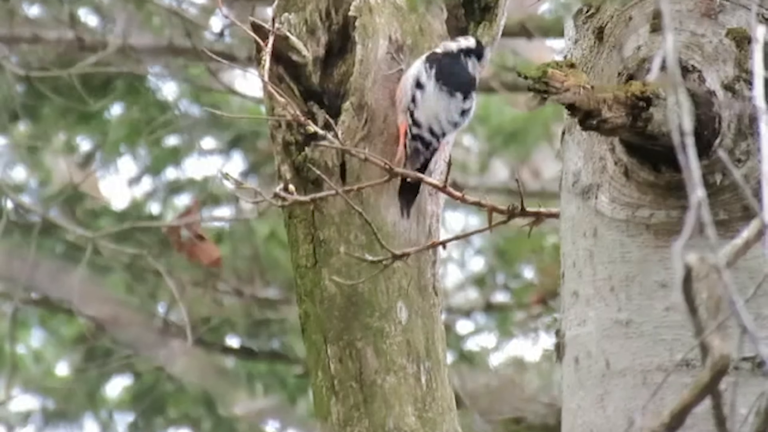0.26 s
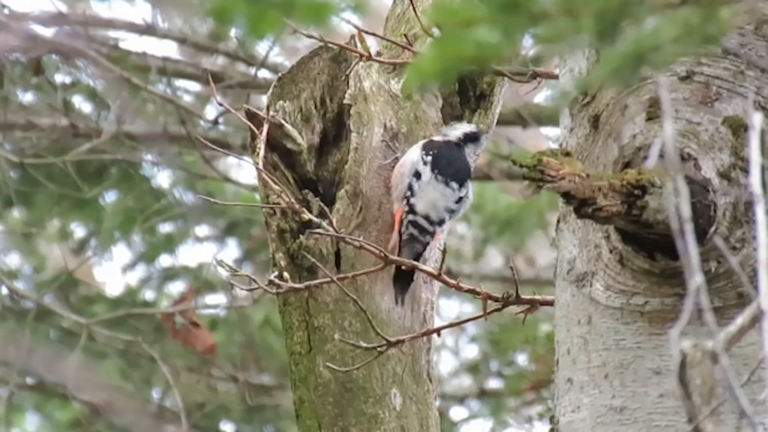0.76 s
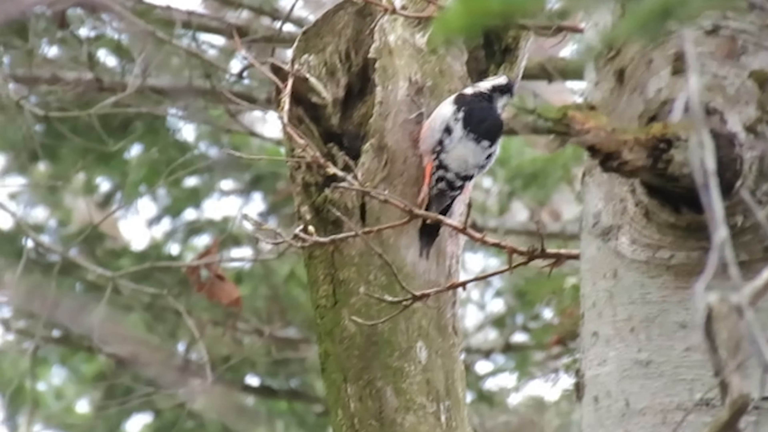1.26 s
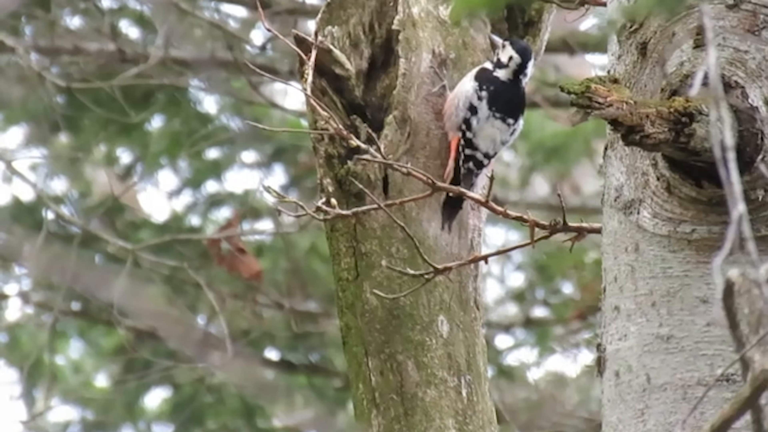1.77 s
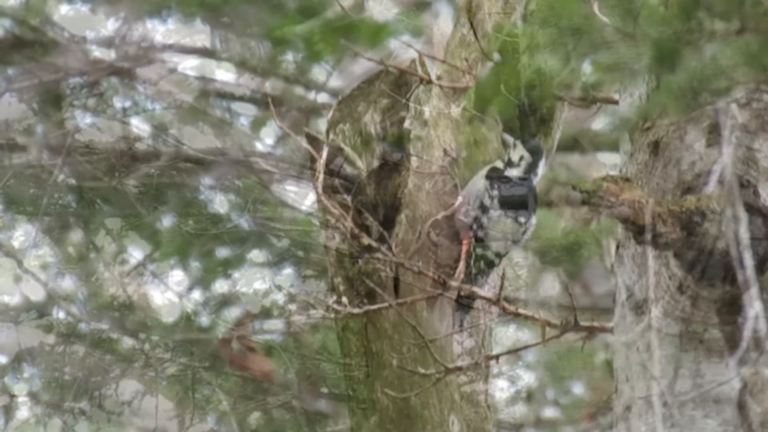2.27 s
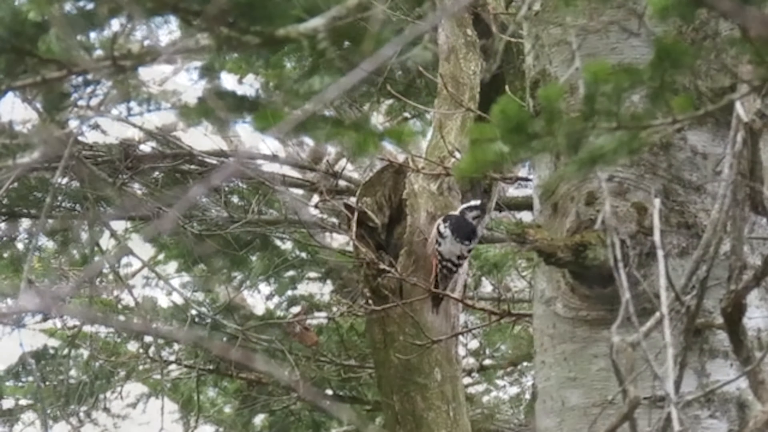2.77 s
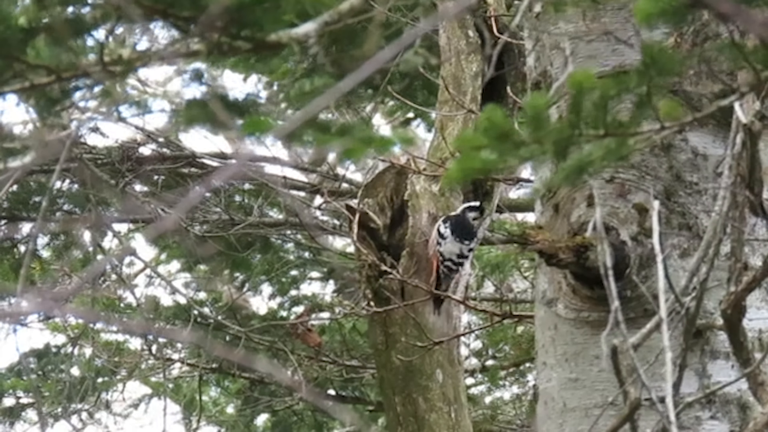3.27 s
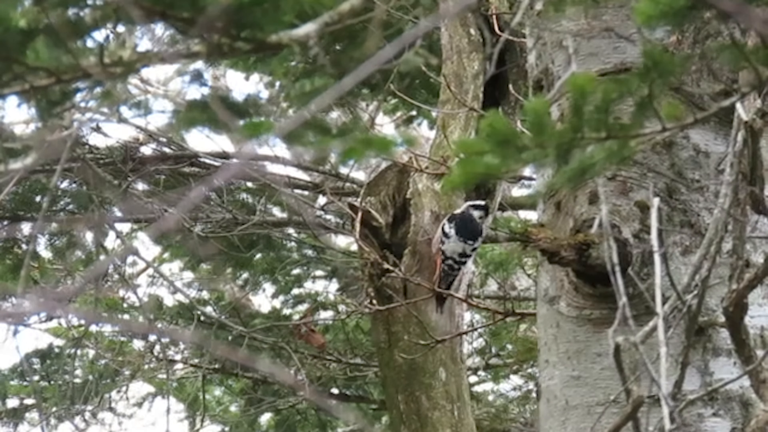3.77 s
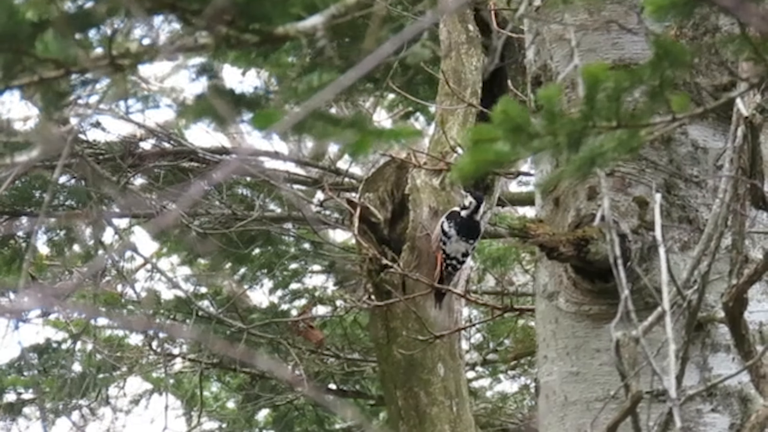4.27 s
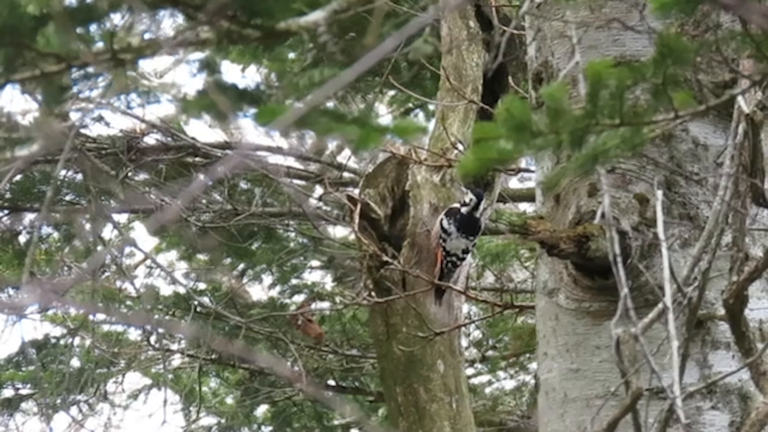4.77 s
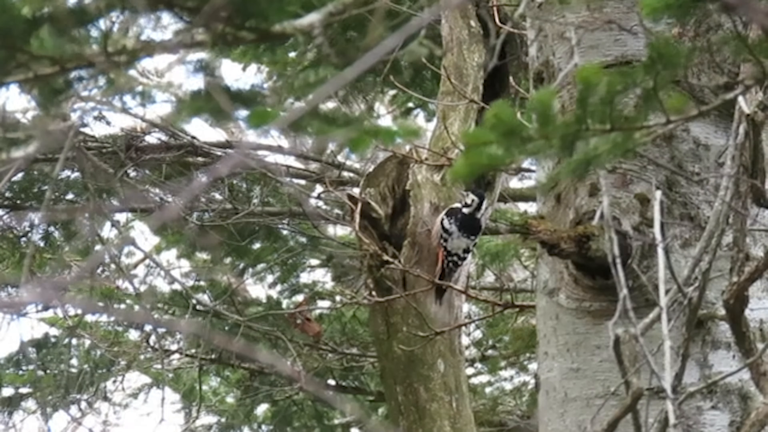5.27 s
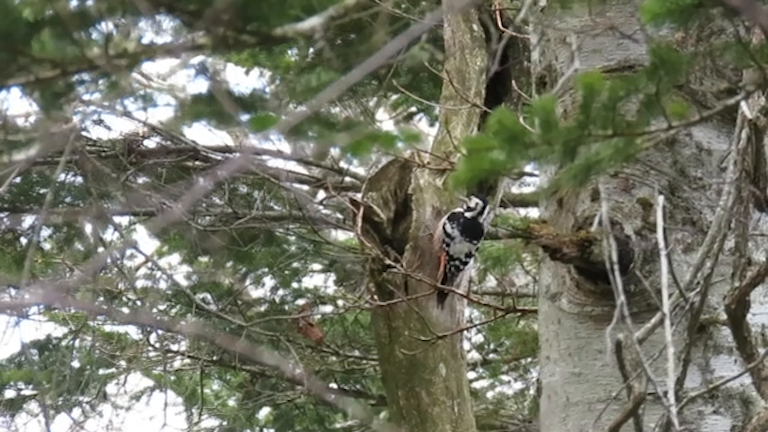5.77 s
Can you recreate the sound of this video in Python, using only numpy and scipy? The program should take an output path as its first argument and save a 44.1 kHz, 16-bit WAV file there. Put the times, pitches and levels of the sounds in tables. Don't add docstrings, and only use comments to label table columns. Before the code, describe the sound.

Fast resonant woodpecker drumming in echoing woods, slowing never but quickening and fading, repeated once, followed by faint crow caws and low wind thumps.

```python
import sys
import numpy as np
from scipy import signal
from scipy.fft import rfft, irfft
from scipy.io import wavfile

SR = 44100
rng = np.random.default_rng(int(sys.argv[2]) if len(sys.argv) > 2 else 0)


def store_pcm(level_fs):
    pcm = np.round(np.clip(level_fs, -1, 1) * 32767).astype(np.int16)
    wavfile.write(sys.argv[1], SR, np.atleast_2d(pcm).T)


def attenuation_scalar(level_db):
    decades = np.asarray(level_db, float) / 20
    return 10 ** decades


N = 265967
RUN_IN = SR // 5

# time [s], peak level [dB].
SCENE_CHANGES = [
    (2.59, -62),
    (2.69, -39),
    (.003, -40),
]


def rms_one(x):
    return x / np.sqrt(np.mean(x ** 2) + 1e-20)


def at_hz(points, hz):
    point_hz, value = np.transpose(points)
    return np.interp(np.log(hz), np.log(point_hz), value)


def drift(rate_hz):
    r = np.exp(-80 * np.pi * rate_hz / SR)
    slow = signal.lfilter([1], [1, -2 * r, r * r], rng.standard_normal(N // 40 + 2002))[2000:]
    return np.interp(np.arange(N) / 40, np.arange(len(slow)), rms_one(slow))


def ring(clicks, hz, t60_s):
    r, w = attenuation_scalar(-60 / (t60_s * SR)), 2 * np.pi * hz / SR
    return signal.lfilter([0, np.sin(w)], [1, -2 * r * np.cos(w), r * r], clicks + 1e-18)


def coloured(noise, spectrum):
    hz = np.fft.rfftfreq(noise.shape[-1], 1 / SR) + 1
    return irfft(rfft(noise) * attenuation_scalar(at_hz(spectrum, hz)), noise.shape[-1])


def band_pass(x, order, low_hz, high_hz):
    return signal.sosfilt(signal.butter(order, [low_hz, high_hz], "band", fs=SR, output="sos"), x)


def low_pass(x, order, hz):
    return signal.sosfilt(signal.butter(order, hz, fs=SR, output="sos"), x)


def delayed(x, s):
    lag = round(s * SR)
    return np.concatenate([np.zeros(lag), x[:-lag]])


def dulled(x, hz):
    r = np.exp(-2 * np.pi * hz / SR)
    return signal.lfilter([1 - r], [1, -r], x)


def stereo(mid, side):
    return np.array([mid + side, mid - side])


def patchy(air, patchy_db):
    edges_hz = [30, 300, 700, 1500, 3000, 6000, 12000]
    out = air * attenuation_scalar(0.39 * drift(3.5))
    for low, high in zip(edges_hz, edges_hz[1:]):
        out = out + band_pass(air, 1, low, high) * (attenuation_scalar(patchy_db * drift(9.0)) - 1)
    return out


def hush(patchy_db):
    # frequency [Hz], density [dB per Hz].
    hush_spectrum = [(20, -13), (50, 4), (125, -7), (250, 1), (630, -2), (1000, -1.5), (1600, -9.5),
                     (2500, -15.5), (4000, -24), (6300, -28.5), (10000, -36), (12500, -38), (14500, -53)]
    # frequency [Hz], side against mid [dB].
    hush_side = [(30, -1), (60, -17.5), (140, 3), (490, 1), (1130, -5.5), (2600, -1.5), (5000, 1),
                 (12000, 1)]
    # time [s], pitch [Hz], level [dB].
    drone_track = [
        (2.45, 60.9, -83),
        (2.7, 78.64, -52),
        (3.1, 83.5, -54),
        (3.5, 97, -55.5),
        (4.0, 98.5, -54.5),
        (4.3, 89.4, -70),
    ]
    t = np.arange(N) / SR
    join_s = SCENE_CHANGES[1][0]
    level_db = np.where(t < join_s, -50 - 0.5 * t, -50.5 - 0.2 * (t - join_s))
    mid, side = rng.standard_normal((2, N))
    air = coloured(np.array([mid, coloured(side, hush_side)]), hush_spectrum)
    air = low_pass(air, 6, 13300)
    air = patchy(air / np.std(air[0]), patchy_db) * attenuation_scalar(level_db)
    track_s, track_hz, track_db = np.transpose(drone_track)
    drone_hz = np.interp(t, track_s, track_hz) * (1 + .07 * drift(10.0))
    drone_db = np.interp(t, track_s, track_db) - 2 + 4 * drift(7.0)
    drone = attenuation_scalar(drone_db) * np.sin(2 * np.pi * np.cumsum(drone_hz) / SR)
    drone = drone * (t > track_s[0]) * (t < track_s[-1])
    return stereo(air[0] + drone, air[1])


def scene_change_clicks():
    out = np.zeros(N)
    for s, db in SCENE_CHANGES:
        out[max(round(s * SR), 1)] = attenuation_scalar(db)
    return out


def wind():
    # peak time [s], peak level [dB].
    gusts = [(4.46, -40.5), (4.68, -46.5), (4.86, -44.5), (5.09, -51), (5.2, -38), (5.289, -32),
             (5.43, -43), (5.5, -38), (5.65, -34.5), (5.76, -37.5), (5.89, -43), (6.0, -40.5)]
    # time [s], mid peak [dB], side peak [dB], width [cycles].
    eddies = [(4.402, -31.5, -34, 0.86), (4.449, -27, -28, 1), (4.468, -26, -21, 0.62),
              (4.52, -20.5, -17.5, 0.26), (4.653, -38, -37, 1), (4.752, -32.5, -35, 1.1),
              (4.835, -37, -27, 0.45), (4.865, -49, -33, 0.34), (4.92, -39, -34, 0.51),
              (5.064, -37, -34, 0.52), (5.176, -33, -29, 0.7), (5.239, -38, -24, 0.74),
              (5.273, -24.5, -15, 0.69), (5.299, -30, -11, 0.93), (5.497, -24.5, -7.5, 0.42),
              (5.522, -32, -21, .36), (5.614, -33, -24, 0.85), (5.648, -16.5, -9.5, 0.3),
              (5.665, -33, -19, 0.4), (5.738, -21, -13.5, 0.22), (5.949, -22, -25, 0.14)]
    rise_db_per_s, fall_db_per_s, gust_side_db = 128, 187, -1
    low_hz, high_hz, side_lift = 43, 139, 1.27
    t = np.arange(N) / SR
    slopes_db = [db - np.maximum(rise_db_per_s * (s - t), fall_db_per_s * (t - s)) for s, db in gusts]
    gust = attenuation_scalar(np.max(slopes_db, axis=0) + 3 * drift(25.0))
    mid = gust * rms_one(band_pass(rng.standard_normal(N), 2, low_hz, high_hz))
    side = rms_one(band_pass(rng.standard_normal(N), 2, low_hz * side_lift, high_hz * side_lift))
    side = gust * side * attenuation_scalar(gust_side_db)
    span = np.arange(-SR // 20, SR // 20)
    for s, mid_db, side_db, cycles in eddies:
        phase = rng.uniform(-0.52, 0.7)
        i = round(s * SR) + span
        side_turns = span / SR * (118 + 1.5 * (side_db + 30))
        mid_turns = side_turns / side_lift
        mid[i] += attenuation_scalar(mid_db) * np.exp(-(mid_turns / cycles) ** 2) * np.cos(2 * np.pi * mid_turns + phase)
        side_swell = attenuation_scalar(side_db) * np.exp(-(side_turns / cycles) ** 2)
        side[i] += side_swell * np.sin(2 * np.pi * side_turns + phase)
    return stereo(mid, side)


def hoarse_calls():
    # start [s], length [s], resonance [Hz], width [Hz], level
    # [dB].
    hoarse = [(-.06, .33, 4700, 200, -67), (.22, .45, 3800, 1400, -65), (3.7, .17, 52, 12, -55),
              (3.2, .85, 260, 40, -63), (4.4, .27, 2700, 1500, -65), (-.06, .31, 3900, 1300, -60),
              (2.4, .19, 3000, 1600, -59), (2.52, .07, 3700, 700, -65), (1.6, .52, 2800, 900, -61),
              (4.41, .14, 3150, 350, -67), (2.0, .04, 6200, 1500, -74), (5.55, .07, 6800, 700, -76),
              (2.5, .2, 70, 70, -57), (2.55, .04, 3850, 300, -64), (5.5, .15, 3300, 200, -74),
              (1.65, .05, 3350, 300, -67)]
    # start [s], length [s], level [dB].
    crow = [
        (4.42, .14, -59),
        (4.82, .19, -58),
        (5.27, .2, -57),
        (5.7, .2, -56),
    ]
    # resonance [Hz], width [Hz], level [dB].
    crow_bands = [(1200, 70, 4), (2240, 710, -5.5), (3300, 150, -21)]
    calls = hoarse + [(s, length_s, hz, width_hz, db + band_db)
                      for s, length_s, db in crow for hz, width_hz, band_db in crow_bands]
    out = np.zeros((2, N + RUN_IN))
    for s, length_s, hz, width_hz, db in calls:
        i, size = round(s * SR) + RUN_IN, round(length_s * SR)
        r = np.exp(-np.pi * width_hz / SR)
        poles = [1, -2 * r * np.cos(2 * np.pi * hz / SR), r * r]
        rough = signal.lfilter([1], np.convolve(poles, poles), rng.standard_normal((2, SR)))
        mid, side = rough[:, 4000:4000 + size]
        swell = signal.windows.tukey(size, .4)
        out[:, i:i + size] += attenuation_scalar(db) * rms_one(stereo(mid, .4 * side)) * swell
    return out[:, RUN_IN:]


def songbirds():
    # (time [s], pitch [Hz]).
    warble = [
        (-55, [(2.375, 2500), (2.39, 2950), (2.405, 3080), (2.42, 2650), (2.44, 2200)]),
        (-55, [(5.05, 2750), (5.065, 2300), (5.088, 3000), (5.108, 1850), (5.12, 1740), (5.155, 1740)]),
        (-58, [(5.22, 1950), (5.265, 2200), (5.28, 2900), (5.29, 3400), (5.308, 3900)]),
        (-61, [(5.372, 3500), (5.382, 2950), (5.398, 2900), (5.41, 2450), (5.425, 1600)]),
    ]
    # start [s], length [s], from [Hz], to [Hz], level [dB].
    whistles = [(1.56, .09, 2550, 2750, -71), (1.69, .06, 3270, 3220, -73), (1.765, .05, 3000, 3000, -65),
                (1.835, .04, 3000, 3050, -69), (1.875, .035, 2400, 2900, -65), (1.94, .04, 2700, 2800, -68),
                (1.985, .08, 2350, 2300, -68), (5.15, .05, 1740, 1750, -66), (2.345, .05, 2200, 2250, -66),
                (2.42, .03, 2600, 2150, -62), (2.3, .045, 2500, 2180, -58), (2.47, .045, 3000, 2850, -68),
                (2.545, .045, 2700, 2980, -67), (2.667, .021, 2560, 2150, -58),
                (2.55, .04, 6300, 5800, -73), (.64, .18, 7600, 7650, -85), (1.1, .1, 8050, 8150, -87),
                (1.2, .07, 8300, 7800, -87), (1.4, .1, 8300, 8100, -89), (1.5, .15, 8000, 8200, -89),
                (1.96, .12, 7900, 6900, -86), (2.78, .06, 7000, 6500, -83), (3.94, .08, 6500, 6350, -85),
                (3.9, .04, 7400, 7000, -87), (5.308, .06, 3880, 3950, -80), (2.41, .1, 3020, 3000, -74),
                (1.64, .1, 3300, 3150, -77), (1.8, .15, 2750, 2800, -76), (4.42, .1, 3150, 3150, -76)]
    glide_share, edge_s, echo_db, echo_t60_s = .35, .005, -3, .7
    notes = list(warble)
    for s, length_s, from_hz, to_hz, db in whistles:
        settled = (s + glide_share * length_s, .3 * from_hz + .7 * to_hz)
        notes.append((db, [(s, from_hz), settled, (s + length_s, to_hz)]))
    dry, waver = np.zeros(N), 1 + .008 * drift(60.0)
    for k, (db, turns) in enumerate(notes):
        turn_s, turn_hz = np.transpose(turns)
        i = np.arange(round(turn_s[0] * SR), round(turn_s[-1] * SR))
        hz = np.interp(i / SR, turn_s, turn_hz)
        level_db = db + 8.0
        if k < len(warble):
            level_db = level_db - 80 * (i - i[0]) / SR
            level_db = level_db - 7 * np.log2(hz / 2500)
        edges = signal.windows.tukey(len(i), 2 * edge_s * SR / len(i))
        dry[i] += attenuation_scalar(level_db) * edges * np.sin(2 * np.pi * np.cumsum(hz * waver[i]) / SR)
    dry = dry * attenuation_scalar(1.6 * drift(37.0))
    t = np.arange(SR // 2) / SR
    wash = rng.standard_normal((2, len(t))) * attenuation_scalar(-60 * t / echo_t60_s)
    wash = (wash + 0.75 * wash[::-1].mean(axis=0)) * attenuation_scalar(echo_db) / np.sqrt(2 * np.sum(wash[0] ** 2))
    cut = round(SCENE_CHANGES[0][0] * SR)
    wet = [signal.fftconvolve(part[None], wash, axes=1)[:, :len(part)] for part in (dry[:cut], dry[cut:])]
    return dry + np.concatenate(wet, axis=1)


def impulses(at, heights):
    out = np.zeros(N + RUN_IN)
    out[at] = heights
    return out


def stand_response():
    # frequency [Hz], density [dB per Hz].
    stand_spectrum = [(200, -47), (400, -13), (490, -14), (555, -5), (590, -0.5), (635, -4.5), (730, -17),
                      (950, -11.5), (1120, -4.5), (1310, -18), (2430, -27), (3050, -32), (4200, -49.5),
                      (6000, -70.5)]
    # frequency [Hz], t60 [s].
    stand_t60 = [(300, 0.52), (600, 0.57), (1100, 0.27), (2000, 0.41), (4000, 0.88)]
    # frequency [Hz], side against mid [dB].
    stand_side = [(300, -6), (500, -12), (800, -17), (1500, -16.5), (3000, -7.5)]
    t = np.arange(SR) / SR
    mid, side = rng.standard_normal((2, SR))
    body = coloured(np.array([mid, coloured(side, stand_side)]), stand_spectrum)
    body = body / np.std(body[0])
    out, edges_hz = 0, [100, 420, 800, 1500, 2800, 9000]
    for low, high in zip(edges_hz, edges_hz[1:]):
        near = attenuation_scalar(-60 * t / at_hz(stand_t60, np.sqrt(low * high)))
        far = attenuation_scalar(-9.5 - 2.0 * high / 1000 - 60 * t / 2.15)
        rise_s = 0.0085 + 0.0048 * min(low, 1500) / 1000
        out = out + band_pass(body, 1, low, high) * (near + far) * (1 - np.exp(-(t / rise_s) ** 2))
    return out


def stand_answer(at, peak_db, treble_db):
    stand_db, varies = -44.5, 0.97
    heights = attenuation_scalar(peak_db + 18 + stand_db)
    treble = attenuation_scalar(treble_db) - 1
    odd_heights = varies * rng.choice([-1, 1], len(at)) * heights

    def brightened(pick, height):
        extra = impulses(at[pick], (treble * height)[pick])
        return impulses(at[pick], height[pick]) + extra - dulled(extra, 1600)

    drives = [dulled(brightened(slice(None), heights), 1820)]
    for k in range(3):
        odd = brightened(slice(k, None, 3), odd_heights)
        drives.append(odd - dulled(odd, 476))
    return sum(signal.fftconvolve(d[None], stand_response(), axes=1)[:, :N + RUN_IN] for d in drives)


def trunk_knock(at, peak_db, tick_db, bright_db):
    # frequency [Hz], level [dB], t60 [s].
    trunk_modes = [(488, -13.2, .045), (582, .4, .0184), (754, 2.9, .0122), (1102, -5.4, .0253),
                   (1187, -13, .02), (1380, -5.9, .0101), (1891, -4.1, .0058), (2376, -9.9, .0056),
                   (2520, -20, .025), (415, -22, .04)]
    # frequency [Hz], level [dB], t60 [s].
    tick_modes = [(2960, -14.5, 0.028), (3920, -19.5, 0.026), (3940, -7, 0.0023), (4550, -18, 0.0033),
                  (5940, -31.5, 0.014)]
    knock = np.zeros(N + RUN_IN)
    for k, (hz, mode_db, t60_s) in enumerate(trunk_modes + tick_modes):
        luck = rng.standard_normal(len(at))
        if k < len(trunk_modes):
            harder_db = (bright_db + 20.0) * np.clip((hz - 600) / 1600, 0, .5)
            blow_db = peak_db - 1 + harder_db + .3 * luck
        else:
            blow_db = tick_db + 7.5 + 16 + 2 * luck
        knock += ring(impulses(at, (-1) ** k * attenuation_scalar(blow_db + mode_db)), hz, t60_s)
    knock = dulled(dulled(knock, 4000), 4000)
    return low_pass(knock, 4, 8000)


def woodpecker():
    # time [s], peak [dB], beak tick [dB].
    earlier = [
        (-.146, -19, -62),
        (-.059, -17, -60),
    ]
    # time [s], peak [dB], beak tick [dB].
    roll_one = [(0.0274, -12.0, -51), (0.109, -10.5, -48), (0.1875, -10.5, -47), (0.2651, -9.5, -47),
                (0.3401, -9.5, -47), (0.4122, -10.5, -48), (0.4836, -11.0, -48), (0.5547, -10.0, -47),
                (0.6219, -11.0, -49), (0.688, -11.0, -52), (0.7526, -11.5, -49), (0.8158, -12.0, -51),
                (0.8762, -12.5, -54), (0.9376, -11.5, -50), (0.9956, -12.5, -57), (1.053, -11.0, -51),
                (1.108, -13.5, -56), (1.1626, -12.0, -54), (1.2154, -13.5, -57), (1.2649, -13.0, -58),
                (1.3143, -13.5, -67), (1.3622, -14.5, -59), (1.4096, -17.0, -59), (1.4559, -17.0, -61),
                (1.5024, -19.5, -61), (1.5476, -17.0, -63), (1.5961, -20.5, -65)]
    # time [s], peak [dB], beak tick [dB].
    roll_two = [(2.7059, -14.5, -59), (2.7933, -11.5, -51), (2.8778, -11.0, -51), (2.9597, -10.5, -50),
                (3.0372, -10.5, -50), (3.1126, -11.0, -52), (3.1841, -11.0, -52), (3.2528, -10.5, -51),
                (3.3203, -11.5, -52), (3.3866, -11.5, -54), (3.4523, -11.5, -55), (3.5147, -13.0, -54),
                (3.5757, -11.5, -55), (3.6352, -12.5, -58), (3.6941, -12.5, -55), (3.7507, -13.5, -58),
                (3.8082, -14.0, -57), (3.8638, -14.0, -54), (3.9203, -14.5, -60), (3.9734, -14.5, -64),
                (4.0244, -14.0, -63), (4.0741, -16.0, -68), (4.1251, -16.0, -66), (4.1728, -18.0, -65),
                (4.227, -20.5, -73)]
    # frequency [Hz], level under the blow [dB], t60 [s].
    hollow = [(591, -41.5, 0.21), (599.7, -24, 0.39), (429, -37.5, 0.12), (908, -38.5, 0.12),
              (1144, -35, .15), (2444, -45.5, 0.38)]
    # delay [s], level [dB], dulled above [Hz].
    neighbour = (0.00318, -1.6, 584)
    # delay [s], signed share of the knock.
    single_trees = [(.0078, -0.13), (.0098, -0.11), (.0116, -0.21), (.0155, -0.27), (.019, -0.13),
                    (.0242, -.09), (.0266, 0.14), (.0317, 0.1), (.0413, 0.089), (.0452, -0.065),
                    (.0495, 0.09), (.0519, -.13), (.0561, 0.21)]
    s, peak_db, tick_db = np.transpose(earlier + roll_one + roll_two)
    blow_delay_s = .0006
    at = np.round((s + blow_delay_s) * SR).astype(int) + RUN_IN
    bright_db = -20 + 1.15 * (peak_db + 11) + .8 * rng.standard_normal(len(s))
    knock = trunk_knock(at, peak_db, tick_db, bright_db)
    lag_s, echo_db, dull_hz = neighbour
    direct = knock + attenuation_scalar(echo_db) * delayed(dulled(knock, dull_hz), lag_s)
    force = impulses(at, attenuation_scalar(peak_db))
    core = sum(ring(attenuation_scalar(db) * force, hz, t60_s) for hz, db, t60_s in hollow)
    trees = [share * delayed(dulled(direct, 2130), tree_s) for tree_s, share in single_trees]
    treble_db = 0.35 * (tick_db - peak_db + 40.0) + .45 * (bright_db + 21.5) - 3 * (s > 2)
    mid, side = stand_answer(at, peak_db, treble_db)
    side = side + attenuation_scalar(-22) * delayed(direct, .0003)
    side = side + .15 * sum((-1) ** k * echo for k, echo in enumerate(trees))
    return stereo(direct + core + sum(trees) + mid, side)[:, RUN_IN:]


def scene():
    background = hush(patchy_db=1.1) + scene_change_clicks() + wind()
    return background + hoarse_calls() + songbirds() + woodpecker()


def top_cut(x):
    return signal.sosfilt(signal.butter(12, 14200, fs=SR, output="sos"), x)


def record(dry):
    mix = signal.sosfilt(signal.butter(2, 35, "high", fs=SR, output="sos"), dry)
    return top_cut(mix)


dry = scene()
out = record(dry)
store_pcm(out)
```